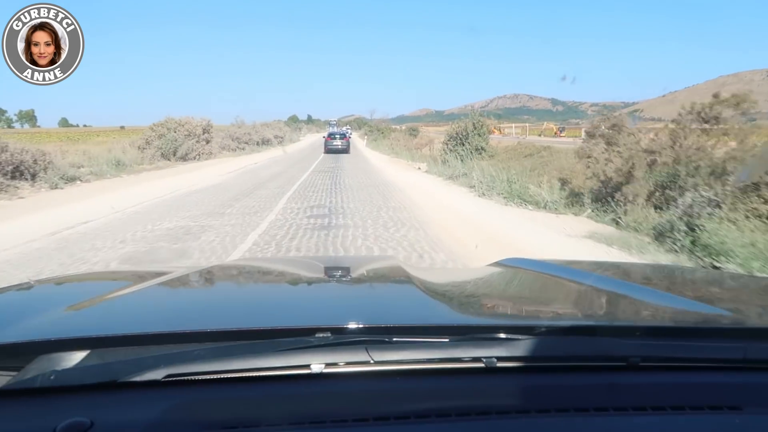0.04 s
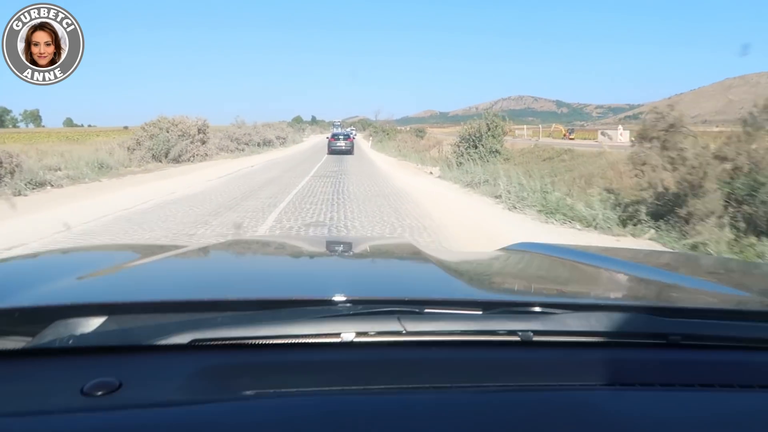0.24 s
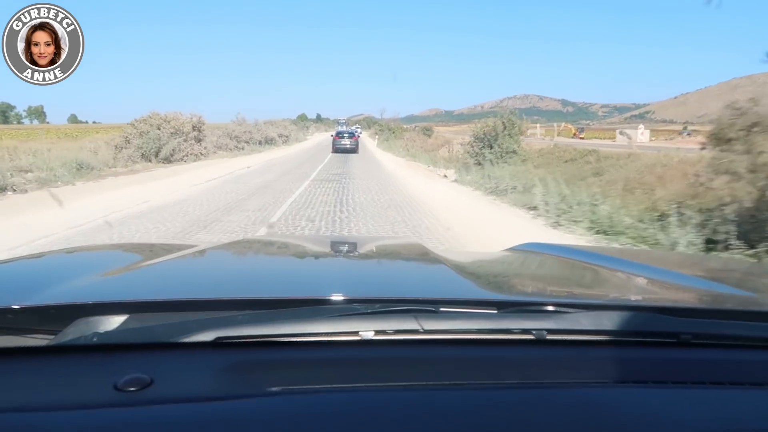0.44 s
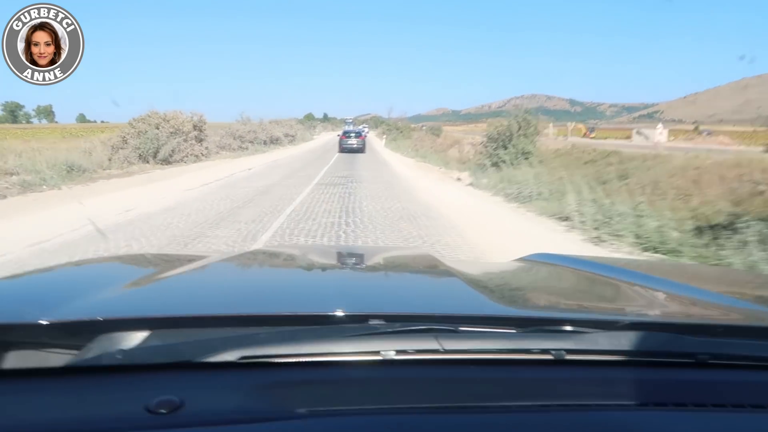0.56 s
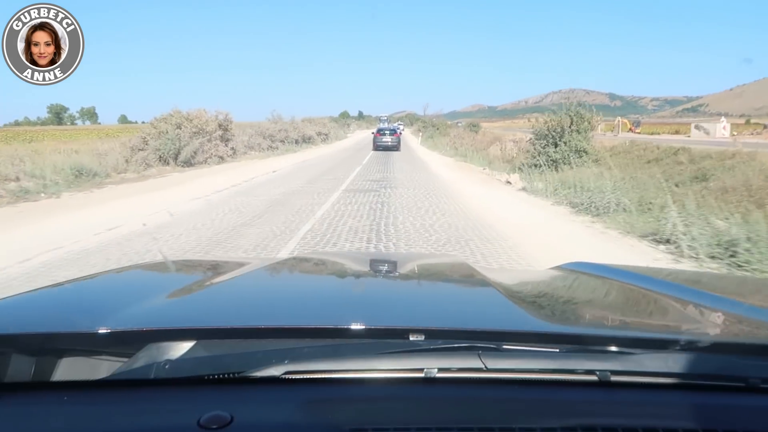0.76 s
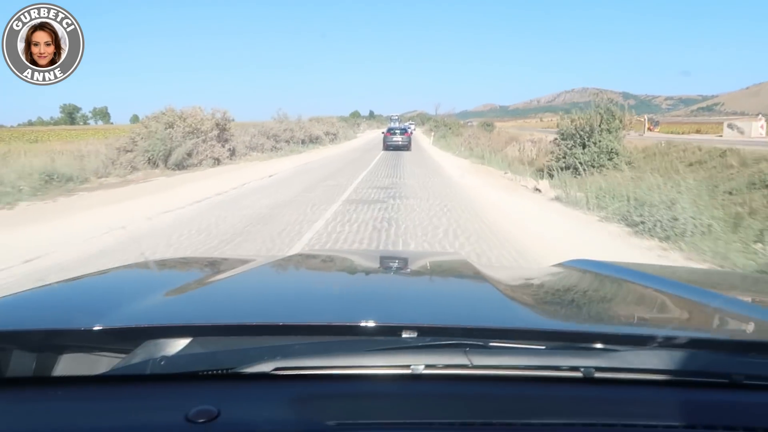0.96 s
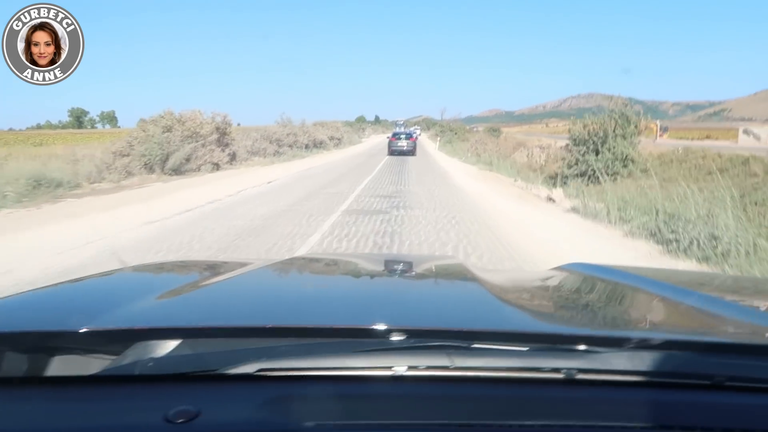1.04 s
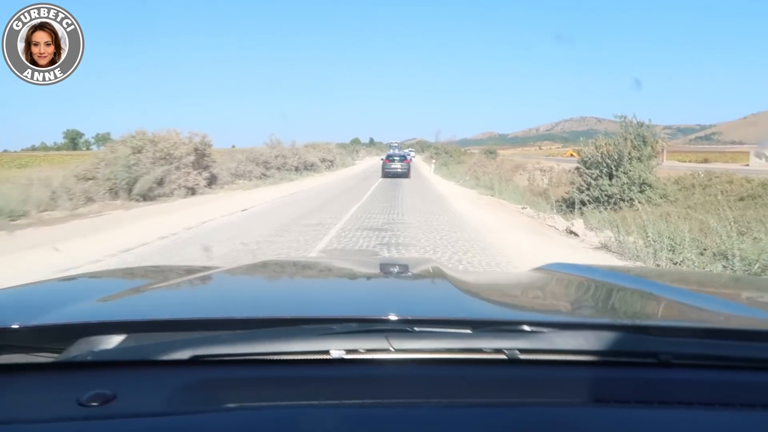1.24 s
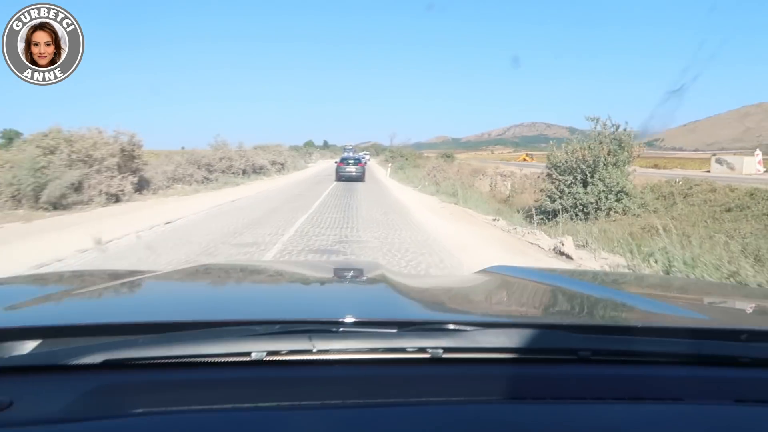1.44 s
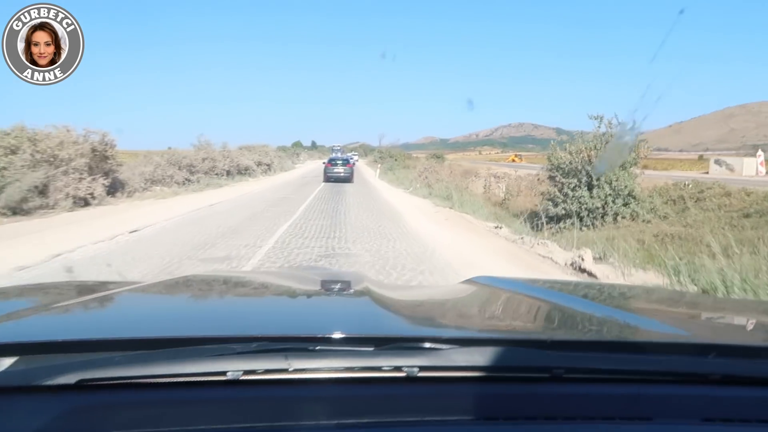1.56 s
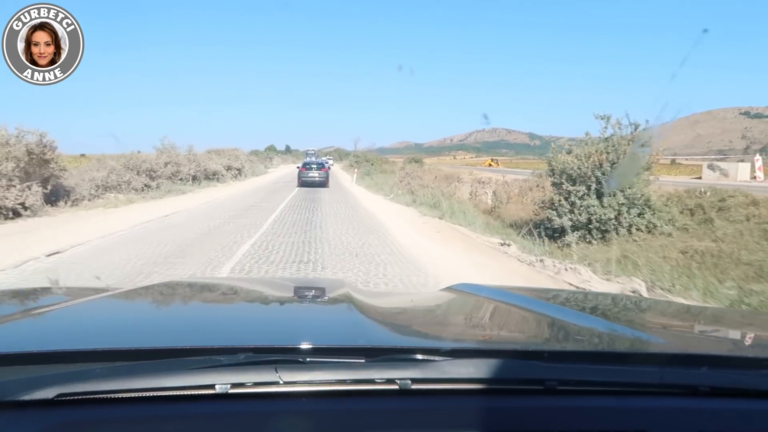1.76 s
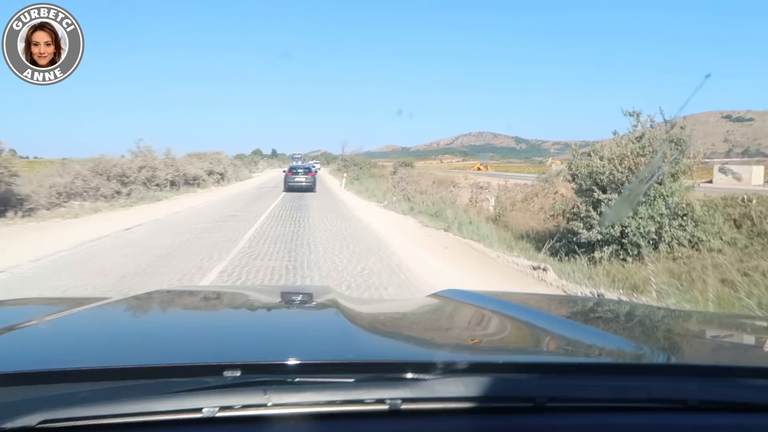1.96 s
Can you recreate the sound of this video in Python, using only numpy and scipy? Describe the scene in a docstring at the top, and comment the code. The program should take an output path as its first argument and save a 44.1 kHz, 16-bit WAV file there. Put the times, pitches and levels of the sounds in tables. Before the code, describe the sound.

Loud, bassy tyre rumble inside a moving car, with hollow knocks and dry dashboard rattles on top

```python
"""A car rolling over stone blocks, heard inside: the cabin booms and drones as two unsteady low tones.
Shaped random impacts on noise make the road's roar through the floor and the thudding of the floor pan.
A loose panel knocks in short sagging tones; dashboard trim rattles as ringing, cracking bursts of contacts,
over a fizz of tiny contacts. Two close microphone ports hear nearly the same bass and a differing treble."""
import sys
import numpy as np
from scipy import signal
from scipy.fft import rfft, irfft, next_fast_len
from scipy.io import wavfile
from scipy.ndimage import map_coordinates

SR = 44100
rng = np.random.default_rng(int(sys.argv[2]) if len(sys.argv) > 2 else 0)


def boost(x):
    """Linear amplitude factor 10**(x/20) for a level x in decibels (scalar or array-like)."""
    u = np.asarray(x, float) / 20
    return 10 ** u


def transcribe(u):
    """Save the signal u as a 16-bit wav file named by the first command-line argument.

    u: samples, shape (n,) or (channels, n), limited to [-1, 1]; the rate is SR.
    q: integer samples, one column per channel.
    """
    v = np.clip(np.atleast_2d(u).T, -1, 1)
    q = np.round(v * 32767).astype(np.int16)
    wavfile.write(sys.argv[1], SR, q)


N = 88288

# quick level shaking of the roar's upper part and of the fizz
SHAKE_DB, SHAKES_PER_S = 1.5, 40


def unit(x):
    """Scale to rms 1."""
    return x / np.sqrt(np.mean(x ** 2) + 1e-20)


def along(points, hz):
    """Read (Hz, value) points on a log frequency axis."""
    point_hz, value = np.transpose(points)
    return np.interp(np.log(hz + 1), np.log(point_hz + 1), value)


def curves(rows):
    """One value per sample for each column after the time."""
    time_s, *columns = np.transpose(rows)
    return [np.interp(np.arange(N) / SR, time_s, column) for column in columns]


def wobble(rate):
    """A smooth random curve through rate knots a second."""
    return map_coordinates(rng.standard_normal(400), [np.arange(N) * rate / SR])


def filtered(x, response):
    """x times a complex response of frequency."""
    m = next_fast_len(N + SR // 2)  # room for tails
    return irfft(rfft(x, m) * response(np.fft.rfftfreq(m, 1 / SR)), m)[..., :N]


def coloured_burst(response, length):
    """A short stretch of noise with the given spectrum, rms 1."""
    return unit(irfft(rfft(rng.standard_normal(length)) * response, length))


def jolts(rate, spread_db, share, colour):
    """Irregular impacts of scattered size, a share of the power, on a bed of noise; coloured, rms 1."""
    struck = rng.random(N) < rate / SR
    sign = np.sign(rng.standard_normal(N))
    hits = unit(struck * sign * boost(spread_db * rng.standard_normal(N)))
    bed = rng.standard_normal(N)
    mixed = np.sqrt(share) * hits + np.sqrt(1 - share) * bed
    return unit(filtered(mixed, lambda hz: boost(along(colour, hz))))


def joint_jolts(colour):
    """Tyres striking block joints: 400 impacts a second on average, mostly buried in noise."""
    return jolts(400, spread_db=3, share=.15, colour=colour)


def resonance(rows):
    """A shaken low resonance: one tone unsteady in pitch and size."""
    waver_hz, waver_db, wavers_per_s = 2, 1.5, 18
    centre_hz, level_db = curves(rows)
    pitch_hz = centre_hz + waver_hz * wobble(wavers_per_s)
    phase = 2 * np.pi * (rng.random() + np.cumsum(pitch_hz) / SR)
    return np.sqrt(2) * boost(level_db + waver_db * wobble(wavers_per_s)) * np.sin(phase)


def fizz():
    """Tiny trim contacts and air hiss; each band of trim pieces adds its own shake to a shared one."""
    # loudness: time_s, level_db
    fizz_levels = [(0.03, -45.5), (0.17, -50), (0.288, -46), (0.408, -45.5), (0.548, -44.5), (0.78, -45.5),
                   (0.9, -50), (1.04, -45.5), (1.186, -49), (1.396, -48.5), (1.55, -51.5), (1.666, -47.5),
                   (1.812, -48), (1.97, -46)]
    # spectrum: frequency_hz, density_db (relative, per Hz)
    fizz_colour = [(500, -21), (800, 8), (1000, 2), (1500, -9.5), (2000, -9), (2600, -12.5), (3500, -15),
                   (5000, -22.5), (7000, -27), (9000, -41), (11000, -47), (12500, -64), (15000, -68)]
    # edges of the bands that shake apart: frequency_hz
    band_edges = [0, 1100, 1700, 2500, 3600, 5500, 20000]
    hiss = jolts(700, spread_db=3, share=.25, colour=fizz_colour)
    shared_shake = wobble(SHAKES_PER_S)
    pieces = 0
    for low_hz, high_hz in zip(band_edges, band_edges[1:]):
        band = filtered(hiss, lambda hz: (hz >= low_hz) * (hz < high_hz))
        pieces = pieces + band * boost(SHAKE_DB * (shared_shake + wobble(SHAKES_PER_S)))
    return boost(curves(fizz_levels)[0]) * pieces


def rattles():
    """Each rattle is a first contact and a dense chatter after it, which crack and ring the trim."""
    # rattles: start_s, peak_db (within 1.4-4 kHz), chatter_s (length),
    # brightness_db_per_octave (held within +-5), spot_hz (best-ringing pitch)
    rattle_events = [(0.0576, -42, .017, 2.5, 2350), (0.097, -45, 0.0078, 0, 2600),
                     (0.126, -53, 0.0073, -13, 1240), (.157, -41, .02, -0.5, 2350),
                     (0.168, -35, 0.012, -1.5, 2570), (0.2215, -38.5, 0.011, 0.5, 2140),
                     (0.2358, -37, 0.017, 2, 2450), (.258, -44, .007, 1, 3150),
                     (0.285, -44.5, 0.0046, 0.5, 2600), (0.3007, -34, .01, -3.5, 2500),
                     (0.344, -35.5, 0.023, 1, 2500), (.367, -42.5, 0.018, 5.5, 3150),
                     (.415, -31, 0.013, -3.5, 2500), (0.435, -48, .0095, 1, 3000),
                     (.477, -38, 0.0099, -6, 2400), (0.4991, -31, 0.015, 3, 2570),
                     (0.518, -40, .016, -0.5, 980), (.558, -38.5, 0.016, -1.5, 1240),
                     (.578, -34, 0.013, 2, 1240), (.603, -38, 0.0098, -4, 2400),
                     (0.6383, -47, .011, -2.5, 1300), (.662, -40, .025, -2, 1240),
                     (0.699, -41.5, 0.0076, 5, 3150), (.7155, -46, .02, 2, 1240),
                     (0.7951, -47.5, 0.014, -3, 1240), (0.855, -45.5, 0.0088, -2, 980),
                     (.964, -42.5, 0.03, -2.5, 1240), (1.0017, -36.5, 0.011, 0.5, 2880),
                     (1.054, -34, .015, -3, 1240), (1.138, -47, .008, -2, 1240),
                     (1.1674, -43.5, 0.011, 1, 3790), (1.208, -40.5, 0.0089, 0, 2600),
                     (1.223, -41, 0.013, 1.5, 1240), (1.244, -38, 0.02, 3.5, 1240),
                     (1.273, -39.5, 0.019, -8, 2100), (1.33, -40, 0.015, -1.5, 2100),
                     (1.3524, -45, .02, -3, 2870), (1.391, -49.5, .008, -6, 2100),
                     (1.457, -45.5, 0.011, -8, 1654), (1.607, -38, 0.013, 1.5, 2100),
                     (1.635, -41, .011, -5, 2350), (1.66, -49, 0.014, 1.5, 3150),
                     (1.726, -38.5, 0.0099, 2.5, 980), (1.748, -47.5, .012, -1.5, 3150),
                     (1.79, -47.5, .012, 1, 980), (1.8066, -40.5, 0.022, 9, 3150),
                     (1.83, -49, 0.015, -1.5, 1654), (1.869, -47.5, 0.016, -4.5, 980),
                     (1.978, -47, 0.012, -5, 2350)]
    # what the trim rings with: pitch_hz, level_db (relative), t60_s
    trim_modes = [(965, 2.5, 0.029), (1240, -0.5, 0.039), (1444, -3.5, 0.034), (1654, -0.5, 0.016),
                  (1835, -7.5, 0.038), (2106, -12, 0.028), (2326, -14, 0.081), (2542, -5.5, 0.018),
                  (2836, -4.5, 0.016), (3146, -9.5, 0.034), (3790, -10.5, 0.014), (4260, -14.5, 0.017),
                  (5400, -15.5, .015)]
    # dry crack of a contact: frequency_hz, density_db (relative, per Hz)
    crack_colour = [(500, -14.5), (900, 1), (1600, -3), (2600, -2), (4000, -22), (6000, -19.5),
                    (9000, -36.5), (12000, -27), (15000, -58)]
    contacts_per_s, contact_rise_s, chatter_db = 1500, .0007, -5  # chatter sits under the first contact
    crack_db, crack_t60_s, mode_spread_db = 6, .013, 2
    favour_db, favour_octaves = 7, .12  # lift of the modes near the spot struck
    out, t = np.zeros(N + SR), np.arange(SR // 10) / SR
    mode_hz, mode_db, mode_t60 = np.transpose(trim_modes)[:, :, None]
    bins = np.fft.rfftfreq(len(t), 1 / SR)
    for start_s, peak_db, chatter_s, bright_db, spot_hz in rattle_events:
        scatter_db = mode_spread_db * rng.standard_normal(mode_hz.shape)
        phase = rng.random(mode_hz.shape)
        decay = boost(mode_db + scatter_db - 60 * t / mode_t60)
        ring = (decay * np.sin(2 * np.pi * (mode_hz * t + phase))).sum(0)
        crack = boost(crack_db - 60 * t / crack_t60_s) * coloured_burst(boost(along(crack_colour, bins)), len(t))
        one_contact = (ring + crack) * (1 - np.exp(-t / contact_rise_s))

        touching = rng.random(len(t)) < contacts_per_s / SR
        chatter = touching * np.sign(rng.standard_normal(len(t))) * np.exp(-(t / chatter_s) ** 2)
        contacts = boost(chatter_db) * chatter + (t == 0)

        tilt_db = np.clip(bright_db, -5, 5) * np.log2(np.clip(bins, 700, 9000) / 1500)
        lift_db = favour_db * np.exp(-(np.log2((bins + 1) / spot_hz) / favour_octaves) ** 2)
        spectrum = rfft(contacts) * rfft(one_contact) * boost(tilt_db + lift_db)
        peak = np.abs(irfft(spectrum * (bins > 1400) * (bins < 4000), len(t))).max()
        out[round(start_s * SR):][:len(t)] += boost(peak_db) * irfft(spectrum, len(t)) / peak
    return out[:N]


def knocks():
    """A loose hollow panel: one short, sagging tone a blow, roughened by a scuff of the same pitch range."""
    # blows: start_s, peak_db (of the tone's envelope), pitch_hz
    blows = [(0.051, -22.5, 560), (0.1, -31, 683), (0.153, -28.5, 559), (0.276, -24.5, 580),
             (0.333, -25.5, 660), (0.396, -25, 564), (0.467, -21, 623), (0.501, -24, 558),
             (0.542, -18, 592), (0.586, -21, 576), (0.629, -22.5, 520), (0.703, -24.5, 624),
             (0.791, -22.5, 551), (0.859, -31, 616), (0.954, -22, 619), (1.005, -30, 505),
             (1.035, -27, 630), (1.054, -24, 415), (1.056, -27.5, 672), (1.13, -26.5, 575),
             (1.244, -25.5, 617), (1.267, -23.5, 556.2), (1.288, -27, 515), (1.323, -33, 581.4),
             (1.642, -37.5, 951), (1.73, -33, 994), (1.796, -42, 1050)]
    t60_s, rise_s = .028, .002
    sag_per_s = 12  # share of pitch lost per second, at first
    scuff_db, scuff_octaves = -9, .7
    out, t = np.zeros(N + SR), np.arange(SR // 10) / SR
    shape = boost(-60 * t / t60_s) * (1 - np.exp(-(t / rise_s) ** 2))
    shape = shape / shape.max()
    bend = 1 + sag_per_s * (.004 - np.minimum(t, .03) / 2)  # starts sharp, falls flat
    bins = np.fft.rfftfreq(len(t), 1 / SR)
    for start_s, peak_db, pitch_hz in blows:
        scuff = coloured_burst(np.exp(-(np.log2((bins + 1) / pitch_hz) / scuff_octaves) ** 2), len(t))
        tone = np.sin(2 * np.pi * pitch_hz * bend * t)
        out[round(start_s * SR):][:len(t)] += boost(peak_db) * shape * (tone + boost(scuff_db) * scuff)
    return out[:N]


def thud():
    """Joint impacts drumming the floor pan, coloured by its low resonances."""
    # loudness: time_s, level_db
    thud_levels = [(0.0, -50.5), (0.1, -21), (0.14, -34), (0.28, -24.5), (0.45, -30), (0.5, -21),
                   (0.67, -25.5), (0.79, -32.5), (0.81, -27.5), (0.87, -35), (1.06, -21), (1.09, -32.5),
                   (1.15, -24.5), (1.32, -20), (1.34, -39.5), (1.36, -27.5), (1.45, -29), (1.53, -25),
                   (1.55, -30.5), (1.83, -27.5), (1.84, -29.5), (2.0, -29)]
    # floor-pan resonances: frequency_hz, density_db (relative, per Hz)
    thud_colour = [(60, -8.5), (90, 9.5), (120, 6.5), (150, 2), (190, -5), (300, -53.5)]
    return boost(curves(thud_levels)[0]) * joint_jolts(thud_colour)


def roar():
    """Tyres on joints through the floor: a low body; an upper part comes and goes, shakes, is weaker late on."""
    # loudness: time_s, level_db, upper_db (upper part against the body)
    roar_levels = [(0.02, -20, 1.5), (0.204, -21, -1), (0.216, -18, 0.5), (0.396, -22, 0),
                   (0.434, -16.5, 0), (0.608, -18, 2.5), (0.942, -24.5, 0), (0.958, -22, 0.5),
                   (1.3, -21, -1), (1.6, -19, -3.5), (1.98, -17, -2)]
    # spectrum: frequency_hz, density_db (relative, per Hz)
    roar_colour = [(8.8, -25.5), (15, -4), (43, -2), (70, -4), (210, -11.5), (354, -21), (668, -30.5),
                   (735, -36), (892, -44), (1080, -51.5), (1500, -48.5), (1950, -68), (3300, -120)]
    upper_hz = 380
    level_db, upper_db = curves(roar_levels)
    road = joint_jolts(roar_colour)
    upper = filtered(road, lambda hz: 1 / (1 + (upper_hz / (hz + 1)) ** 4))
    body = road - upper
    return boost(level_db) * (body + boost(upper_db + SHAKE_DB * wobble(SHAKES_PER_S)) * upper)


def drone():
    """The body's drone: a shaken resonance above the boom."""
    # course of the drone: time_s, pitch_hz (before its waver), level_db
    drone_course = [(0, 75.5, -30.5), (.1, 74.35, -19.5), (.2, 75.8, -20.5), (.27, 65.8, -18),
                    (.38, 68.6, -24), (.46, 68.9, -41.5), (.55, 63.1, -20.5), (.7, 69.1, -28),
                    (.85, 72.07, -26), (1, 68.9, -21.5), (1.1, 71.76, -27.5), (1.2, 61.8, -14.5),
                    (1.28, 76.3, -33), (1.4, 73.4, -30), (1.55, 76.15, -40), (1.7, 75.56, -22.5),
                    (1.84, 79, -16), (2, 80.17, -23.5)]
    return resonance(drone_course)


def boom():
    """The cabin's boom: its lowest shaken resonance."""
    # course of the boom: time_s, pitch_hz (before its waver), level_db
    boom_course = [(0, 44.66, -13), (.05, 42.23, -19), (.1, 41.38, -18), (.15, 42.8, -11),
                   (.21, 49.4, -12.5), (.28, 42.04, -17), (.36, 45.22, -15.5), (.45, 44.73, -42),
                   (.53, 54.3, -19), (.61, 45.73, -11.5), (.66, 43.4, -14.5), (.71, 41.36, -8.5),
                   (.8, 35.85, -26), (.86, 39.8, -20), (.91, 42.54, -14), (.945, 43.1, -19),
                   (.99, 43.46, -13), (1.06, 45.18, -13.5), (1.12, 44.7, -33.5), (1.19, 48.8, -11),
                   (1.23, 45.03, -10.5), (1.27, 42.66, -11), (1.34, 39.46, -26.5), (1.4, 40.6, -23),
                   (1.45, 40.27, -18), (1.51, 39.9, -27), (1.57, 39.98, -24.5), (1.65, 45.45, -17.5),
                   (1.8, 41.5, -26.5), (1.9, 43.96, -37.5), (2, 48, -19)]
    return resonance(boom_course)


def scene():
    """The ports share one sound; separate draws of thud, roar, fizz and rattles, in opposite sign, part them."""
    # difference between the ports: frequency_hz, side_minus_mid_db
    apart = [(30, -39), (60, -50.5), (125, -35), (250, -23.5), (500, -23), (1000, -17), (2000, -12.5),
             (3200, -7.5), (5000, -3), (8000, 2.5), (12000, 7), (15000, -4)]
    # right port hears the treble louder: frequency_hz, left_minus_right_db
    lean = [(500, 0), (1000, -.4), (2000, -.9), (4000, -.8), (8000, -.3)]
    left_lag_s = 1.5e-5

    def shaken():
        """One draw of everything the road shakes broadly."""
        return thud() + roar() + fizz() + rattles()

    mid = boom() + drone() + knocks() + shaken()
    side = filtered(shaken(), lambda hz: boost(along(apart, hz)))
    late = filtered(mid, lambda hz: boost(along(lean, hz)) * np.exp(-2j * np.pi * hz * left_lag_s))
    return np.array([late + side, mid - side])


def band_limit(x):
    """A steep low-pass at the top of the band."""
    return signal.sosfilt(signal.butter(12, 15000, fs=SR, output="sos"), x)


def record(dry):
    """The whole sound is dulled above about 7 kHz."""
    # treble roll-off: frequency_hz, gain_db
    treble_rolloff = [(7200, 0), (9000, -3.5), (11000, -5), (12500, -12), (15000, -20)]
    dulled = filtered(dry, lambda hz: boost(along(treble_rolloff, hz)))
    return band_limit(dulled)


dry = scene()
out = record(dry)
transcribe(out)
```